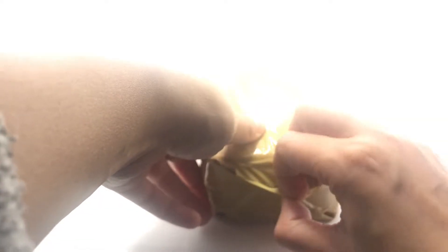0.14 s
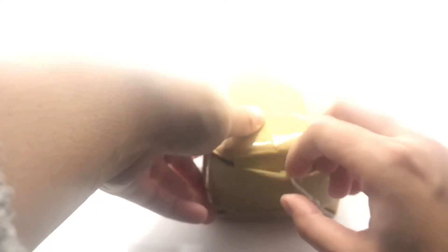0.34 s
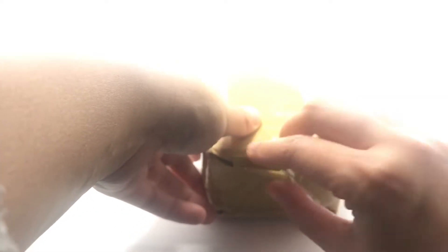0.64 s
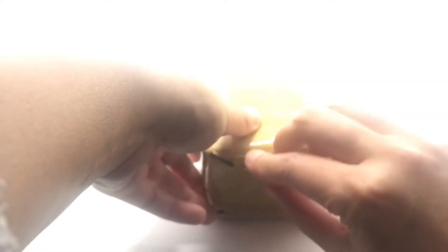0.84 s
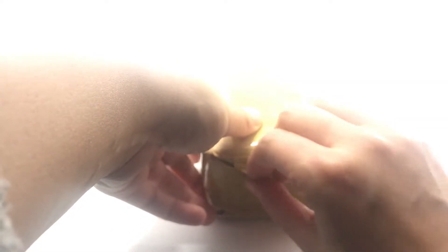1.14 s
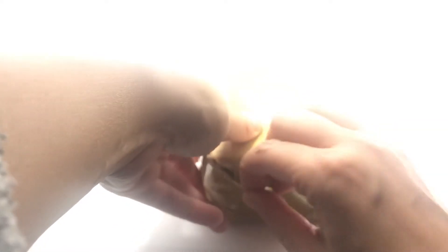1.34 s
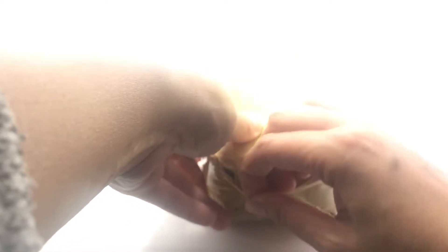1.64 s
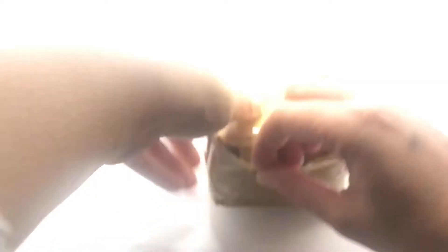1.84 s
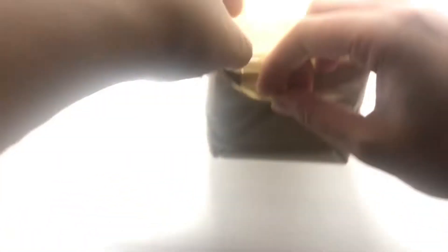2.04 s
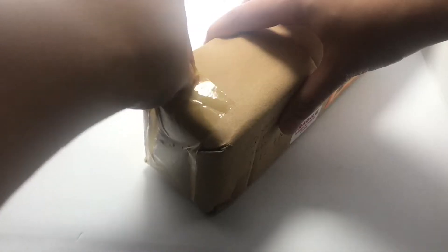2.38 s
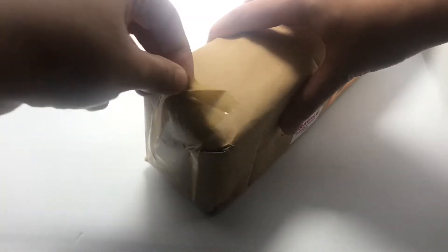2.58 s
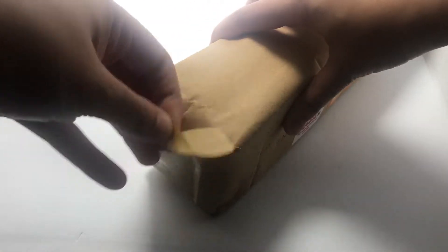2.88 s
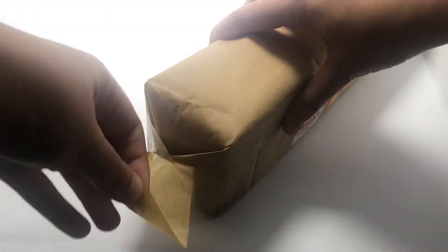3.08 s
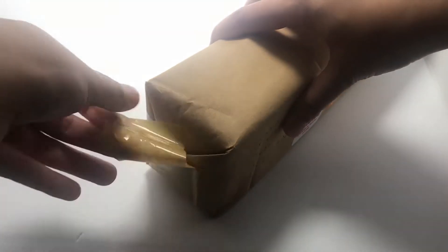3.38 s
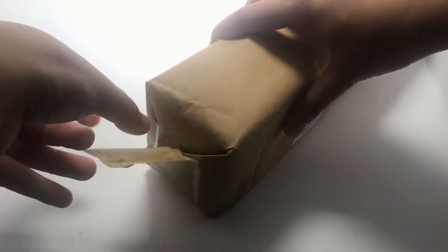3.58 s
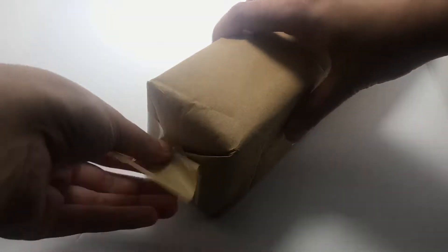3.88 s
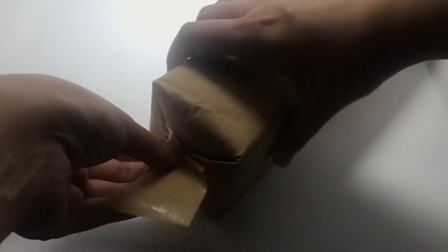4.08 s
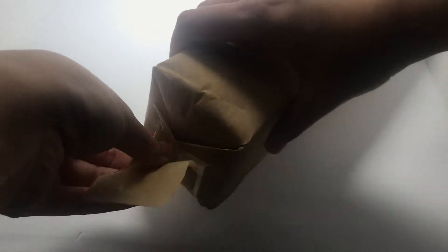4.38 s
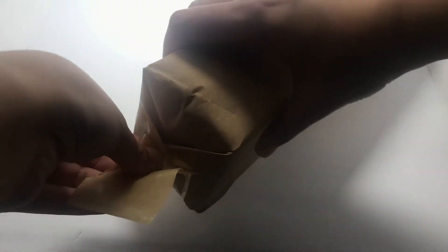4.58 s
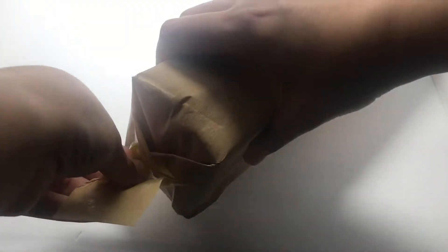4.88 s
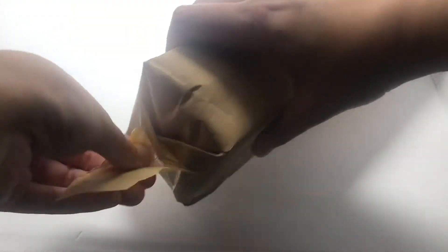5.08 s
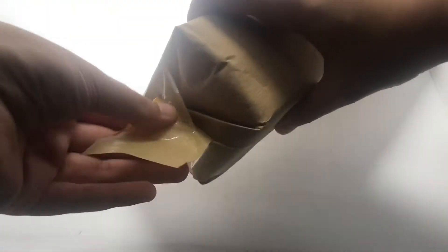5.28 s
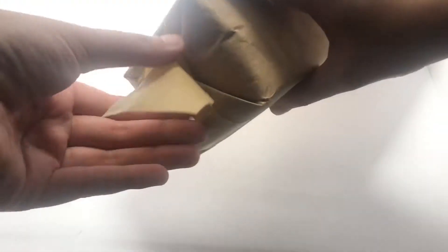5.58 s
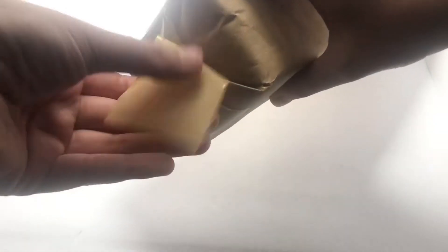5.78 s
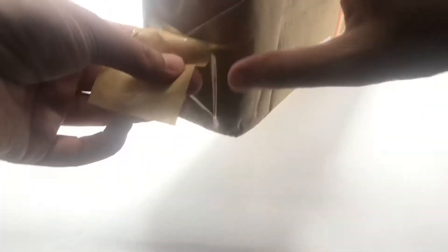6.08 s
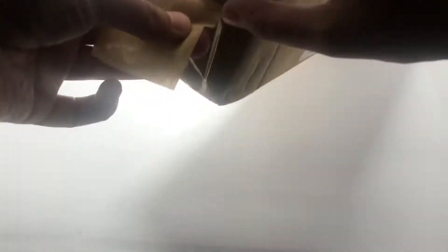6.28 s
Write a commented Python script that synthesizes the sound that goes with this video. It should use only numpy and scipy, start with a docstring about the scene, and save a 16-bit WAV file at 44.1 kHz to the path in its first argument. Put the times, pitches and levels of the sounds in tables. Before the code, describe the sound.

A close, dry indoor sound of hands peeling tape from a paper-wrapped hollow box on a table. From 0 to 1.1 s there is only faint rubbing and small papery ticks. At about 1.22 and 1.27 s two sharp, bright snaps come with low thuds, followed by soft scraping until 1.8 s. A crisp click and light bump fall near 1.95 s, and the sound drops out very briefly around 2.07 s. From 2.4 s the tape starts to tear, swelling into a loud, rasping hiss with hard cracks, strongest from 2.8 to 2.95 s, then stopping abruptly. Short scrapes and snaps follow at 3.3 and 3.45 s. From 3.8 s irregular crinkling and brief peels grow denser, with deep box thuds around 5.05 to 5.1 s, a flurry of crackles near 5.2 s, a clear pop at 6.2 s and a last soft bump at 6.4 s. Faint bassy room noise lies underneath.

```python
"""Packing tape peels off a cardboard parcel wrapped in kraft paper, close to a microphone on a table.
Hands work in short strokes and one long pull: grains of noise become a hiss of tearing, scraping and rubbing.
The stiff sheet buckles in dry snaps, millisecond bursts in five bands, each with a decaying sine as its ring.
The hollow box rumbles, thuds and rings through tuned modes; a small room adds a decaying noise tail
and a faint steady noise."""
import sys
import numpy as np
from scipy import signal
from scipy.fft import rfft, irfft, next_fast_len
from scipy.io import wavfile
from scipy.ndimage import map_coordinates

SR = 44100
rng = np.random.default_rng(int(sys.argv[2]) if len(sys.argv) > 2 else 0)


def wav_out(sig):
    """Save sig, one row per channel (or a flat mono array), as 16-bit PCM at SR to the path in sys.argv[1]."""
    wavfile.write(sys.argv[1], SR, np.round(np.clip(np.atleast_2d(sig).T, -1, 1) * 32767).astype(np.int16))


N = 283563  # length of the scene in samples


def amp(db):
    """Decibels to gain."""
    return 10 ** (np.asarray(db) / 20)


def unit(x):
    """x at rms 1."""
    return x / np.sqrt(np.mean(x ** 2) + 1e-20)


def unit_energy(x):
    """x with a sum of squares of 1."""
    return x / (np.linalg.norm(x) + 1e-20)


def along(points, hz):
    """(Hz, value) points read on a log frequency axis."""
    point_hz, values = np.transpose(points)
    return np.interp(np.log(hz + 1), np.log(point_hz + 1), values)


def curves(rows):
    """One value per sample for each column after the time in seconds."""
    times, *columns = np.transpose(rows)
    return [np.interp(np.arange(N) / SR, times, column) for column in columns]


def wobble(rate):
    """A smooth random curve, rate knots a second."""
    knots = rng.standard_normal(int(N * rate / SR) + 4)
    return map_coordinates(knots, [np.arange(N) * rate / SR])


def filtered(x, response):
    """x times a complex response of frequency."""
    size = next_fast_len(N + SR // 2)
    hz = np.fft.rfftfreq(size, 1 / SR)
    return irfft(rfft(x, size) * response(hz), size)[:N]


def coloured(x, spectrum):
    """x given a spectrum, at rms 1."""
    return unit(filtered(x, lambda hz: amp(along(spectrum, hz))))


def add(track, s, sound):
    """Mix a sound into the track at s seconds."""
    start = max(round(s * SR), 0)
    part = sound[:max(N - start, 0)]
    track[start:start + len(part)] += part


# The long pull that strips the tape off. Each row: time in seconds, then the relative levels in dB of
# fingers on the box, of paper scraping, and of fibres and glue parting.
LONG_PULL = [(2.35, -64, -63, -65.5), (2.422, -55.5, -46, -41), (2.572, -39.5, -39, -35.5),
             (2.706, -48, -45, -34), (2.826, -40.5, -32, -31.5), (2.955, -31.5, -33.5, -36),
             (3.02, -55.5, -52.5, -55)]
# A hand takes hold, slides or pulls, and lets go. Each row: start in seconds, length in seconds, then
# the relative levels in dB of fingers on the box, of paper scraping, and of fibres and glue parting,
# and last the swell from start to end in dB.
STROKES = [(0, .07, -66, -61, -52.5, 0), (0.15, 0.17, -54.5, -58, -64, 1.5),
           (0.322, 0.11, -62, -60, -58, -7), (0.539, 0.05, -65, -61, -64, -9),
           (0.672, 0.074, -63.5, -62, -66, 3), (0.851, 0.17, -63.5, -57, -59.5, -3.5),
           (1.121, 0.18, -53.5, -53, -52.5, 9), (1.283, 0.29, -54, -53.5, -50.5, 4.5),
           (1.688, .14, -55, -55.5, -59.5, -5.5), (1.916, 0.048, -43, -43.5, -47, 4.5),
           (1.972, 0.051, -49, -49, -50, -3.5), (2.11, 0.056, -57.5, -54.5, -50.5, -5.5),
           (2.236, .046, -52.5, -52.5, -53, -11.5), (3.05, 0.042, -61, -49, -47, -10),
           (3.125, 0.14, -56, -64, -66, 6.5), (3.26, 0.041, -43, -37.5, -40.5, 10.5),
           (3.316, 0.026, -56, -42.5, -46, -11), (3.436, 0.038, -47.5, -44.5, -49.5, 6),
           (3.679, 0.018, -63, -52, -55.5, 6), (3.807, .15, -54.5, -49.5, -53, 4.5),
           (3.993, 0.086, -66, -55, -51.5, 5), (4.118, 0.18, -49.5, -51, -55, -4),
           (4.312, 0.025, -47, -41, -47.5, 11.5), (4.397, .273, -50, -51.5, -48, 3),
           (4.705, 0.12, -51.5, -47.5, -38.5, 1), (4.873, 0.032, -49, -43.5, -38.5, -2.5),
           (4.924, 0.039, -57.5, -55.5, -49.5, -7), (5.041, 0.076, -43, -43, -45.5, 9.5),
           (5.143, .23, -51.5, -47, -53, 0), (5.402, 0.14, -59, -59.5, -62.5, 0),
           (5.627, 0.074, -56.5, -52.5, -52, -16), (5.778, 0.028, -46, -43.5, -41.5, 1.5),
           (5.871, 0.036, -44.5, -46, -49.5, -5), (5.986, 0.42, -56, -54, -52.5, 2),
           (6.363, .055, -44, -46, -47.5, -5)]
ATTACK_DB_PER_S, RELEASE_DB_PER_S = 390.5, 421  # how fast a stroke builds and dies
REST_DB = -75  # faint rustle of the resting hands


def effort():
    """Levels of rubbing, scraping and peeling in dB: each stroke builds, swells or eases, and dies."""
    t = np.arange(0, N, SR // 1000) / SR

    def edges_db(start, end):
        before, after = np.maximum(start - t, 0), np.maximum(t - end, 0)
        return -ATTACK_DB_PER_S * before - RELEASE_DB_PER_S * after

    times, *layers_db = np.transpose(LONG_PULL)
    pull_edges_db = edges_db(times[0], times[-1])
    pull_db = [np.interp(t, times, db) + pull_edges_db for db in layers_db]
    power = amp(REST_DB) ** 2 + amp(pull_db) ** 2
    for start, length, *layers_db, swell_db in STROKES:
        progress = np.clip((t - start) / length, 0, 1)
        shape_db = edges_db(start, start + length) + swell_db * (progress - .5)
        power = power + amp(np.add.outer(layers_db, shape_db)) ** 2
    return curves(np.column_stack([t, *10 * np.log10(power)]))


def grains(rate, spread_db):
    """Tiny breaks at random moments, rate a second, most small and a few large, at rms 1."""
    breaks = rng.random(N) < rate / SR
    signs = rng.choice([-1, 1], N)
    sizes = amp(spread_db * np.clip(rng.standard_normal(N), -2.5, 2.5))
    return unit(breaks * signs * sizes)


# Spectra of fibres and glue parting, of paper scraping and of fingers rubbing.
# Each row: frequency in Hz, relative density in dB per Hz.
PEEL_SPECTRUM = [(3200, -21), (6200, -3.5), (8500, 1), (10500, -1.5), (12800, 4.5), (16000, -1)]
SCRAPE_SPECTRUM = [(700, -6.5), (1500, 0), (2200, 0), (3200, -0.5), (5200, -1), (6500, 0), (9500, -47)]
RUB_SPECTRUM = [(150, -16.5), (380, -9.5), (620, 4), (950, 5.5), (1400, -7), (2400, -47.5)]


def friction(rub_db, scrape_db, peel_db):
    """Tape peels, paper scrapes and fingers rub: all three catch and slip together."""
    # a crease gives way in a tiny avalanche of fibres, over within a millisecond or two
    t = np.arange(SR // 100) / SR
    avalanche = amp(-60 * t / 0.0023)
    avalanches = signal.fftconvolve(np.abs(grains(rate=170, spread_db=3.5)), avalanche)[:N]
    # a slow pull crackles; in a fast one the separate crinkles merge into the hiss
    crinkle_gain = amp(np.interp(peel_db, [-48, -35], [0, -6]))
    crinkles = unit(avalanches * rng.standard_normal(N)) * crinkle_gain

    def texture(crinkle_db):
        # under the crinkles lies a steady fizz of single fibres
        fizz = grains(rate=6000, spread_db=3.0)
        return scattered(fizz + amp(crinkle_db) * crinkles, echo_db=-3.5)

    slip = wobble(55)
    peel = flap(coloured(texture(crinkle_db=0), PEEL_SPECTRUM))
    scrape = flap(coloured(texture(crinkle_db=-2), SCRAPE_SPECTRUM))
    rub = coloured(texture(crinkle_db=-0.5), RUB_SPECTRUM)
    peel = amp(peel_db + 3.0 + 1.5 * slip) * peel
    scrape = amp(scrape_db - 0.57 + 2.0 * slip) * scrape
    rub = amp(rub_db - 2.0 + 2.2 * slip + 2.93 * wobble(35)) * rub
    return rub + scrape + peel


# The free flap colours the peeling and scraping, anew with each grip.
# Each row: start in seconds, resonance in Hz, its strength against the direct sound in dB.
FLAP = [(0, 4070, -7), (.5, 5970, -25), (1.3, 4800, -2.5), (1.6, 3220, -18), (2.4, 6070, -7.5),
        (3.0, 3100, -13.5), (4.0, 6080, -22), (5.4, 2930, -8), (6.04, 2480, 4.5)]
FLAP_WIDTH = .11  # spread of the resonance in natural log of frequency


def flap(x):
    """x through the broad resonance of the free flap, at rms 1."""
    hz, t, spectrum = signal.stft(x, SR, nperseg=512)
    starts, centre_hz, db = np.transpose(FLAP)
    grip = np.searchsorted(starts[1:], t)
    distance = np.log((hz[:, None] + 1) / centre_hz[grip]) / FLAP_WIDTH
    gain = 1 + amp(db[grip]) * np.exp(-.5 * distance ** 2)
    return unit(signal.istft(spectrum * gain, SR, nperseg=512)[1][:N])


# The sheet buckles or the tape lets go. Each row: time in seconds, level in dB of its energy spread
# over 1 ms, brightness in dB per octave, knock on the box in relative dB, pitch in Hz of the ring
# that follows (a paper facet or, at 600-900 Hz, a box wall), echo in dB.
SNAPS = [(0.0225, -37.5, 3, -18, 8560, -14), (0.1643, -39.5, -3.5, -21, 3150, -7),
         (0.178, -32.5, 2, -28, 2900, -10), (.198, -33, 2, -9, 3930, 1.5), (.2387, -37, -3.5, -33, 1220, 4),
         (0.292, -27.5, 5, -27, 9200, -10), (.3494, -24.5, 2.5, -21, 4140, -4),
         (.3737, -31.5, 13, -27, 6200, -10), (0.4251, -25.5, 1, -11.5, 600, 0),
         (0.555, -37.5, 5, -24, 3290, 9), (0.6015, -31, -3.5, -7, 656, -7), (.8491, -37, -6.5, -9, 674, -1),
         (0.8715, -27.5, -1.5, -11, 637, 4.5), (.907, -25.5, 3, -18, 5600, -7.5),
         (1.0103, -28.5, 0.5, -5, 8340, -1.5), (1.1262, -35, -0.5, -2, 694, -12),
         (1.1452, -25, 4, -13, 3970, -7), (1.1782, -29.5, -3, -28, 2330, -5),
         (1.2235, -8, 4, -33, 3130, -6), (1.2675, -7.5, 5.5, -27.5, 12200, -3.5),
         (1.5233, -27, 9.5, -15, 12000, -3.5), (1.5428, -27.5, -1, 6, 690, 9),
         (1.61, -32.5, -5, -7, 1330, 8), (1.712, -27, -6, -39, 1800, 9.5),
         (1.8565, -27.5, -6.5, -13, 1070, -2.5), (1.9492, -18, 0, -8.5, 3550, 0.5),
         (2.0177, -31.5, -2, -1, 3970, -1), (2.245, -31, 11.5, -30, 12400, 1),
         (2.2633, -34.5, -2, -4, 855, 11), (2.2843, -26.5, 7.5, -29, 12300, 0),
         (2.3476, -32, -3, -3.5, 1310, 4.5), (2.3943, -23.5, -0.5, -13.5, 2980, 4),
         (2.5587, -18.5, 5, -19.5, 9200, -4.5), (2.5941, -19.5, 4.5, -19, 12700, -7),
         (2.6468, -22, -0.5, 1, 12300, 5), (2.7961, -2, 5, -34.5, 6250, -3),
         (2.835, -2.5, 3, -19.5, 10750, -9.5), (2.857, -3.5, 2.5, -21.5, 3250, 0.5),
         (2.9267, -1.5, 1.5, -22, 11200, -0.5), (2.936, -7.5, -1, -16, 730, 4),
         (2.9505, -0.5, 2.5, -21, 1185, 4), (3.0513, -31, -1.5, -19, 704, -7),
         (3.1707, -35.5, 3, -10, 12000, -1), (3.2077, -32.5, -3, -28, 1570, -3),
         (3.2449, -24.5, 5, -21, 5370, 0.5), (3.2783, -19, 3.5, -17, 3120, -1.5),
         (3.298, -12.5, 4.5, -21, 13900, -17.5), (3.3058, -15, 2.5, -31, 930, -0.5),
         (3.4112, -31, -1.5, -15.5, 12840, .5), (3.441, -18, 2, -26.5, 12500, -2),
         (3.466, -16, 1, -7, 4820, 4.5), (3.6079, -39, 2.5, -30, 5050, -5.5),
         (3.8511, -30, 3.5, -26, 2380, -1), (3.897, -22.5, 3.5, -23.5, 13700, -2),
         (3.935, -25.5, 3, -7, 3470, -2), (3.9562, -24, -1.5, -7.5, 860, -5.5),
         (4.0571, -25.5, -4.5, -8.5, 1680, 11), (4.0947, -28, 5, -37, 6300, -19),
         (4.1092, -23, -6.5, -20, 1080, 14), (4.1353, -27, -4.5, -30, 5410, 5),
         (4.1458, -24.5, 1.5, -16, 8060, 7.5), (4.166, -20, 7.5, -36, 4200, -7.5),
         (4.215, -29.5, 0.5, -13, 8300, -8), (4.2466, -22, -0.5, -23, 2500, -3),
         (4.2701, -28, -1.5, -21, 740, 4), (4.325, -18, 0.5, -9.5, 1650, -5.5),
         (4.349, -18, -1.5, -15, 856, 0), (4.3545, -17, 3, -34, 6100, -7),
         (4.5088, -28.5, -5.5, -10, 724, -4), (4.5887, -21, 11, -34, 11600, -11),
         (4.6247, -22.5, -2.5, -7.5, 583, 4), (4.7264, -15, -2, -33, 1930, -7.5),
         (4.8163, -20, 0, -22, 2400, -3), (4.8433, -19.5, 6.5, -40, 3460, -7.5),
         (4.8774, -16.5, 4.5, -27, 5740, -5.5), (5.021, -35.5, 7, -15, 14000, -1),
         (5.1227, -22, 4, -23, 12300, 3.5), (5.15, -28, -1.5, -40, 6530, -6),
         (5.1643, -21, -.5, -42, 3320, -2), (5.1734, -18.5, 8.5, -23, 11300, -8),
         (5.1872, -21.5, 0, -30, 3070, 0), (5.2245, -23, -4, -12, 596, -5),
         (5.24, -21, 3.5, -37, 14000, -13), (5.2465, -19, 10, -26, 14000, -13),
         (5.26, -15.5, 7.5, -34.5, 6160, -8), (5.2991, -29.5, 2.5, -12, 5410, -15),
         (5.3122, -23, -0.5, -19, 985, -9), (5.3399, -19.5, 1, -5.5, 13900, -7.5),
         (5.3833, -33.5, 9.5, -21, 11400, -12), (5.4118, -36.5, 11, -20, 13120, -14),
         (5.4768, -34, -3.5, -32, 685, -11), (5.4637, -27, 5.5, -27, 12400, -13),
         (5.5023, -29, 3.5, -23, 3300, -8.5), (5.5228, -27, 2, -25, 2550, -9.5),
         (5.6083, -30, 3.5, -21, 13800, 4.5), (5.651, -25, 3.5, -9.5, 8200, -5),
         (5.682, -27.5, 6.5, -24, 6260, -10), (5.7033, -32, 5.5, -32, 12570, -15),
         (5.7581, -23, 9.5, -31, 12500, -11.5), (5.7724, -26.5, 3.5, -30, 8500, -3),
         (5.85, -23, 3, -28, 3420, -9), (5.8737, -20.5, 0.5, -16, 2540, -3),
         (5.9138, -21.5, 3.5, -20, 4200, -6), (5.958, -17, 6, -32, 14250, -7.5),
         (6.0182, -21, 3.5, -20, 13200, -10), (6.195, -10.5, 1, -49, 2550, -7),
         (6.2176, -26.5, -3.5, -20, 2600, -3), (6.2302, -23.5, -4.5, -8.5, 660, 1),
         (6.2707, -30.5, 14.5, -32, 3970, -5), (6.371, -28.5, 4.5, -23.5, 2040, -1),
         (6.413, -19, -1.5, -10, 1670, -10)]
# Parts of a snap, from the box's knock to the fibres' crack.
# Each row: low edge in Hz, high edge in Hz, t60 in seconds.
SNAP_BANDS = [(151.6, 455, .02), (580, 1350, 0.0088), (1450, 3690, 0.0031), (3930, 7500, 0.0037),
              (7850, 15840, 0.0047)]
# The paper's share of each band above the knock, in dB before a snap's own brightness tilts it.
PAPER_DB = [-0.34, -1.55, -0.24, -0.74]
RING_DB = -4.5  # a ring at 4 kHz, relative to the paper
RING_DB_PER_OCTAVE = 1  # small taut facets ring more freely than large slack ones
FREE_DB = -21  # with less knock than this the sheet buckles freely
FOCUS_DB = 0.13  # a free snap loses its ends: dB per octave squared, for each dB of knock below FREE_DB


def snaps():
    """Each buckle is a millisecond burst that knocks the box; a paper facet or box wall rings with it."""
    out, t = np.zeros(N), np.arange(SR // 12) / SR
    filters = [signal.butter(3, [low, high], "band", fs=SR, output="sos") for low, high, _ in SNAP_BANDS]
    octaves = np.log2([np.sqrt(low * high) for low, high, _ in SNAP_BANDS[1:]])
    octaves = octaves - octaves.mean()

    def burst(t60):
        return rng.standard_normal(len(t)) * amp(-60 * t / t60) * (1 - np.exp(-t / .0001))

    for s, db, brightness, knock_db, ring_hz, echo_db in SNAPS:
        parts = [signal.sosfilt(band, burst(t60)) for band, (_, _, t60) in zip(filters, SNAP_BANDS)]
        # the ring loses the same share on every cycle, so high ones die soonest
        parts.append(np.sin(2 * np.pi * ring_hz * t) * amp(-3 * ring_hz * t))
        heard = signal.fftconvolve(parts, near_path(t, echo_db)[None], axes=1)
        # a snap against the box is broad; a free one, with little knock, is a narrower pop
        focus_db = FOCUS_DB * np.maximum(FREE_DB - knock_db, 0)
        paper = unit_energy(amp(PAPER_DB + brightness * octaves - focus_db * octaves ** 2))
        ring_db = RING_DB + RING_DB_PER_OCTAVE * np.log2(ring_hz / 4000)
        shares = unit_energy(np.array([amp(knock_db), *paper, amp(ring_db)]))
        snap = sum(share * unit_energy(part) for share, part in zip(shares, heard))
        add(out, s, amp(db) * np.sqrt(SR / 1000) * snap)
    return out


def near_path(t, echo_db, delay=.0022, t60=0.026):
    """Sound goes straight to the microphone; scatter from hands, box and table follows after a gap."""
    scatter = rng.standard_normal(len(t)) * (t > delay) * amp(-60 * t / t60)
    path = amp(echo_db) * unit_energy(scatter)
    path[0] = 1
    return path


def scattered(x, echo_db, size=1024):
    """The hands keep moving, so each block of size samples gets new near echoes."""
    out, t = np.zeros(N), np.arange(SR // 25) / SR
    for start in range(0, N, size):
        add(out, start / SR, signal.fftconvolve(x[start:start + size], near_path(t, echo_db)))
    return out


# Rumble of the parcel under the hands. Each row: frequency in Hz, relative density in dB per Hz.
RUMBLE_SPECTRUM = [(25, -19), (70, -6.5), (150, -13.5), (280, 1), (420, -5.5), (800, -41.5)]
# Soft bumps of the parcel. Each row: time in seconds, relative peak in dB, hardness in dB per octave
# (a soft one stirs only the deep modes).
BUMPS = [(.201, -44, 7), (.873, -40, 0.5), (1.014, -37, -2), (1.228, -25.5, -2), (1.272, -27, 0),
         (1.542, -26.5, -6), (1.956, -32.5, 4), (2.016, -38, 8), (2.645, -36.5, 10), (2.941, -31, 0),
         (3.473, -35, -1), (3.774, -39.5, -5), (3.954, -47, 7), (5.048, -21.5, -1), (5.096, -26.5, 2),
         (5.107, -23.5, 1), (5.331, -43, -1), (6.403, -32, 0)]
# Modes of the parcel on the table. Each row: frequency in Hz, relative level in dB, t60 in seconds.
PARCEL_MODES = [(76, -13.5, 0.1), (98, -11, 0.12), (138.6, -3.5, 0.16), (166, -3, 0.048), (208, 0, 0.077),
                (259.3, -5.5, 0.11)]
# rumble level before the cap, for rubbing at -50 dB, and its dB for each dB of rubbing
RUMBLE_DB, RUMBLE_GROWS = -57, 0.93
# the rumble grows no louder than this, as in the long pull, where the flap is free of the box
RUMBLE_MAX_DB = -58


def handling(rub_db):
    """The parcel rumbles under the hands and thuds at each soft bump as its modes die away."""
    rumble_db = np.minimum(RUMBLE_DB + RUMBLE_GROWS * (rub_db + 50), RUMBLE_MAX_DB)
    # the capped level still wavers a few dB
    out = amp(rumble_db + 3.5 * wobble(28)) * coloured(rng.standard_normal(N), RUMBLE_SPECTRUM)
    t = np.arange(SR // 4) / SR
    for s, db, hardness in BUMPS:
        # one push starts all modes together; the grip shifts them a little from bump to bump
        thud = np.zeros(len(t))
        for hz, level_db, t60 in PARCEL_MODES:
            mode_db = level_db + hardness * np.log2(hz) + rng.normal(0, 1.1)
            mode_hz = hz * (1 + rng.normal(0, 0.056))
            thud += amp(mode_db - 60 * t / t60) * np.sin(2 * np.pi * mode_hz * t)
        thud *= 1 - np.exp(-t / 0.0023)
        add(out, s, amp(db - 4.0) * thud / np.abs(thud).max())
    return out


# Resonances of the box walls. Each row: frequency in Hz, width in Hz, relative level in dB.
WALLS = [(669, 64, -2), (865, 41, -20.5), (1237, 11, -8.5), (3140, 2400, -11)]


def box(x):
    """The hollow box and its taut wrapping ring along with the paper, as parallel resonances."""
    def response(f):
        ring = sum(amp(db) * 1j * f * width / (centre ** 2 - f ** 2 + 1j * f * width)
                   for centre, width, db in WALLS)
        return amp(-1) * (1 + ring)
    return filtered(x, response)


# Decay of the room. Each row: frequency in Hz, t60 in seconds.
ROOM_DECAY = [(150, 0.77), (1000, 0.25), (5000, 0.065), (15000, 0.14)]


def room(x):
    """A small room's tail: noise that dies at its own pace in each band, after a short gap."""
    hz, t, spectrum = signal.stft(rng.standard_normal(SR // 2), SR, nperseg=256)
    decay = amp(-60 * t / along(ROOM_DECAY, hz)[:, None])
    tail = signal.istft(spectrum * decay, SR, nperseg=256)[1]
    return signal.fftconvolve(x, unit_energy(np.pad(tail, (SR // 150, 0))))[:N]


# Spectrum of the steady background. Each row: frequency in Hz, relative density in dB per Hz.
ROOM_NOISE = [(15, -8), (33, 2), (90, -4), (200, -12.5), (600, -38), (1400, -26), (10000, -36),
              (16000, -40)]


def room_noise():
    """Faint steady noise, strongest in the bass."""
    return amp(-63.5) * coloured(rng.standard_normal(N), ROOM_NOISE)


def scene():
    """Paper and parcel in the room, over its faint steady noise."""
    rub_db, scrape_db, peel_db = effort()
    paper = friction(rub_db, scrape_db, peel_db) + snaps()
    parcel = box(paper) + handling(rub_db)
    return (parcel + amp(-21.5) * room(parcel) + room_noise())[None]


# The level dips briefly. Each row: time in seconds, level in dB.
LEVEL_DIP = [(2.05, 1), (2.068, -16), (2.078, -26), (2.09, 0)]
TOP_HZ = 16050  # nothing is heard from here up


def record(dry):
    """The level dips once, the loudest peaks overload softly, and the top is cut off."""
    dip_db, = curves(LEVEL_DIP)
    x = dry[0] * amp(dip_db)
    x = x / (1 + np.abs(x / .95) ** 4) ** (1 / 4)
    return filtered(x, lambda hz: hz < TOP_HZ)[None]


dry = scene()
out = record(dry)
wav_out(out)
```